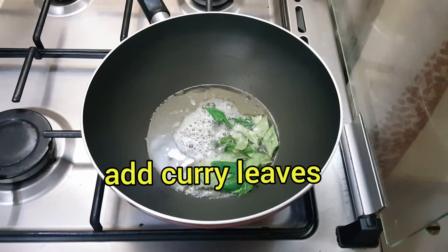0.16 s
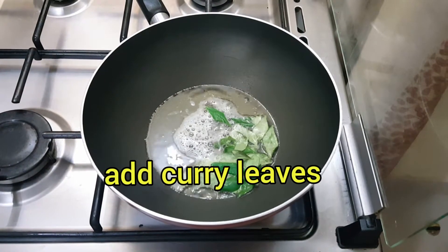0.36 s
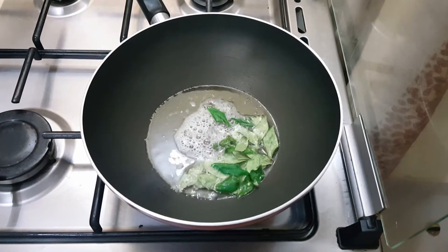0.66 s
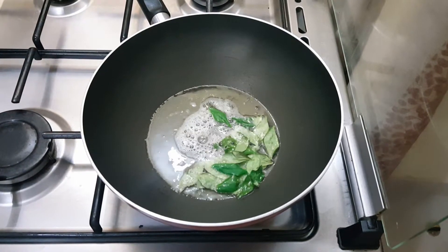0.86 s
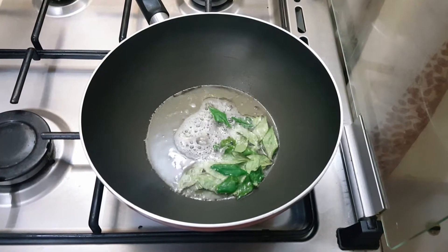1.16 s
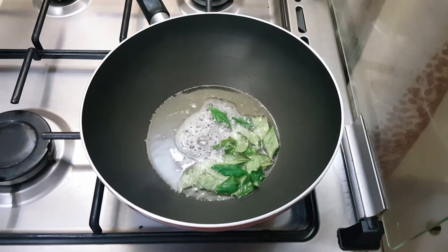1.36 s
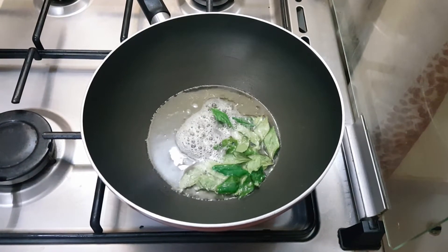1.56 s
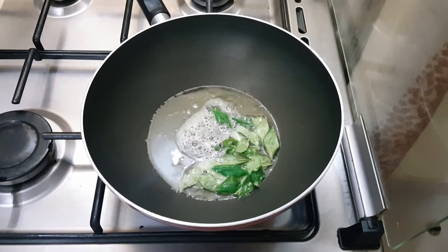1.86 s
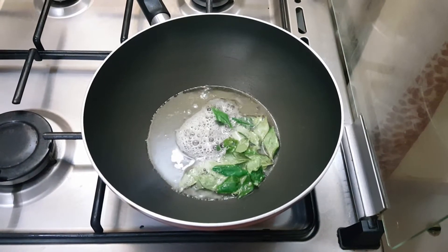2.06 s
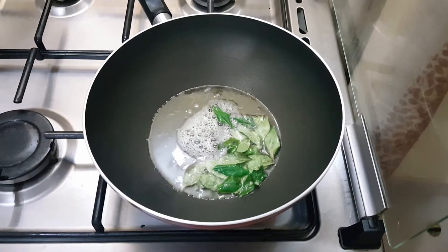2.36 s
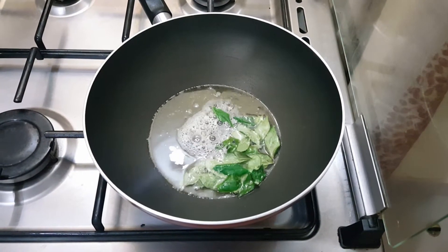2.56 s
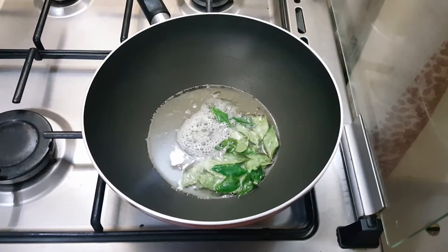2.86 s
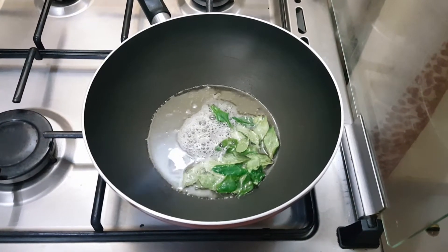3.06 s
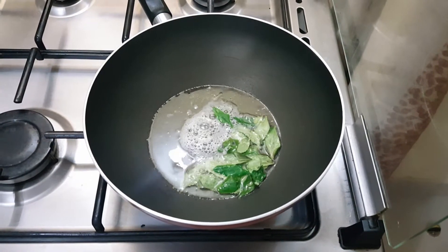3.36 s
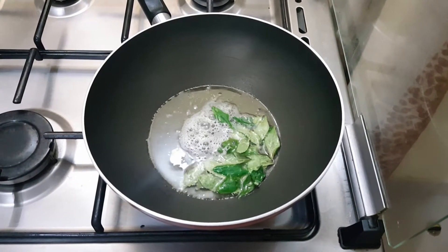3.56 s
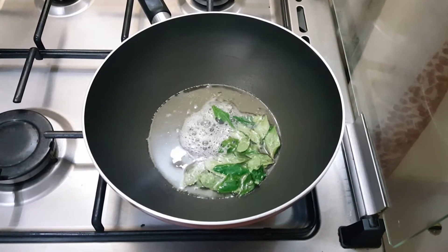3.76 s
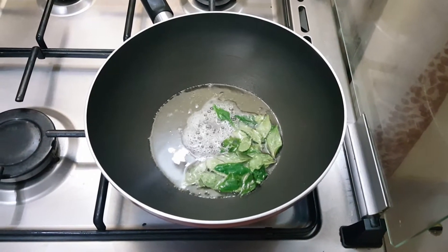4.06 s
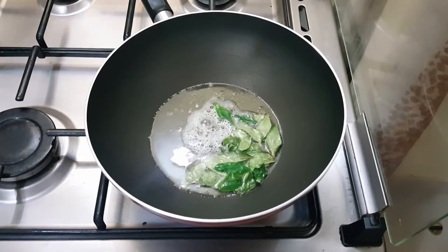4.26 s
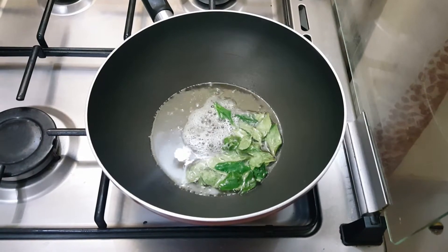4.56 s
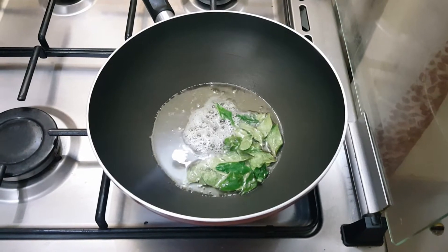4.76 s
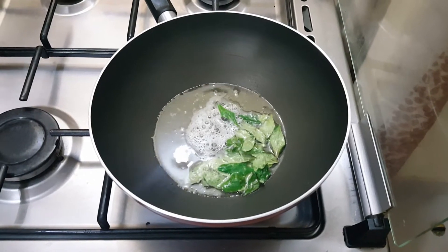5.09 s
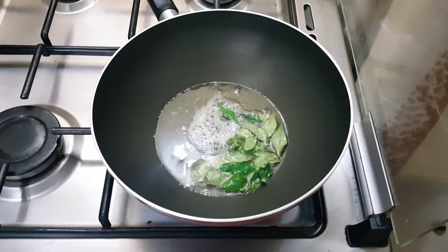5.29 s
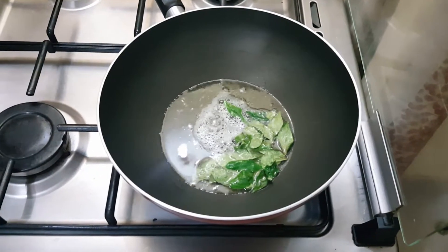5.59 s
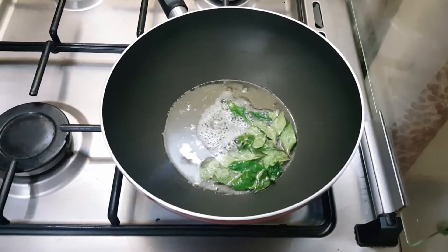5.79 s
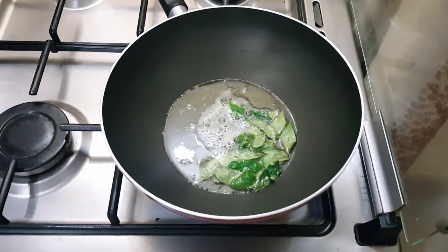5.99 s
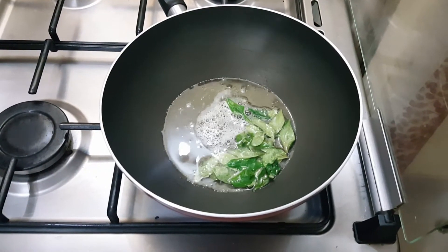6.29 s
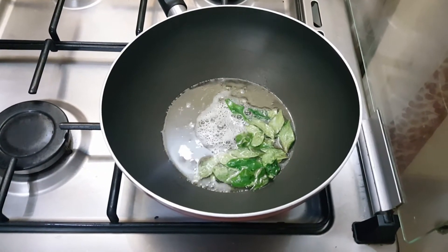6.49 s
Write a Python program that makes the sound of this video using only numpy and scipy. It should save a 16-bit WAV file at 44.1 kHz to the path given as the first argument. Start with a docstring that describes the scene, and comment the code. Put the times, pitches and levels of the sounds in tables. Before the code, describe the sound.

Heard from just above a wok on a home stove: a quiet, crisp sizzle with random hard pops, a few standing out loudly around one second, and fine spitting droplets between them. Bubbling eases steadily as the leaves dry, until only scattered clicks remain with wisps of fizz. Beneath lies a low, soft flame rumble with mains hum. The small room adds a brief, diffuse tail, and the pops lean slightly left.

```python
"""Curry leaves frying in a wok

Curry leaves and seeds fry in a pool of hot oil in a wok, heard from just above it in a small kitchen.
Steam bubbles pop as short damped sines with a noisy tear; oil spits are noise cracks with a push of air.
Swarms of tiny bubbles and filtered noise make a sizzle that thins out as the leaves dry.
Random echoes stand for the wok's wall and the room; noise and sines make stove rumble, mains hum and a drone.
"""
import sys
import numpy as np
from scipy import signal
from scipy.fft import rfft, irfft, next_fast_len
from scipy.io import wavfile
from scipy.ndimage import uniform_filter1d, map_coordinates

SR = 44100
rng = np.random.default_rng(int(sys.argv[2]) if len(sys.argv) > 2 else 0)


def generate_wav(sig):
    """Save sig (samples, or channels by samples) to the path in sys.argv[1] as 16-bit PCM at SR."""
    pcm = np.round(np.clip(np.atleast_2d(sig).T, -1, 1) * 32767).astype(np.int16)
    wavfile.write(sys.argv[1], SR, pcm)


N = 292383

# Large steam bubbles bursting. Each row: start in seconds, relative level in dB, pitch in Hz, ring in cycles.
POPS = [(.035, -33, 3420, 4.5), (0.112, -30.5, 3170, 0.75), (.129, -30, 4280, 1.6),
        (0.252, -28.5, 3580, 2.8), (0.3029, -33, 5030, 2.5), (0.4256, -28, 2400, 2.3),
        (0.5536, -30, 3710, .8), (.7046, -32, 3580, 4.3), (0.8135, -31.5, 4000, 2.5),
        (0.8818, -30, 3320, 2.2), (.8853, -23, 3740, 2.6), (1.0798, -36, 2970, 1.2),
        (1.0964, -31.5, 5070, 3.7), (1.1141, -16.5, 2320, 1.96), (1.242, -26.5, 3800, 0.99),
        (1.2536, -25.5, 2260, 1.6), (1.2635, -22.5, 2420, 2.3), (1.3962, -23, 2570, 1.8),
        (1.407, -27.5, 3640, 0.8), (1.4178, -15, 2130, 1.15), (1.434, -30, 1600, 1.2),
        (1.483, -31, 3930, 1.5), (1.5723, -23.5, 4400, 4.5), (1.6598, -26, 3400, 1.6),
        (1.7139, -28.5, 2750, 0.8), (1.7913, -32, 3160, 4), (1.8103, -26.5, 3200, 3.7),
        (1.9191, -32.5, 2630, 1.9), (1.9857, -33.5, 3200, 2.7), (2.0265, -33.5, 2400, 1.4),
        (2.0867, -28, 2740, 1.1), (2.1673, -22.5, 2970, 4.5), (2.2767, -35, 2120, 1.6),
        (2.361, -31.5, 3460, 2.3), (2.429, -36, 2290, 1.7), (2.4984, -31.5, 2100, 1.1),
        (2.508, -30.5, 2320, 2.6), (2.583, -23, 3400, 2.2), (2.616, -28, 2310, 1.7),
        (2.817, -26, 2270, 0.96), (2.8276, -21.5, 2680, 3.9), (2.9456, -32, 2190, 1.9),
        (3.0293, -29, 2280, 1.4), (3.0596, -31.5, 2540, 1.1), (3.0848, -27.5, 1840, 1.6),
        (3.1757, -36, 2620, 3.4), (3.1936, -33, 3300, 0.92), (3.2653, -29.5, 2600, 2.2),
        (3.3312, -34.5, 3370, 1.2), (3.3447, -37.5, 3730, 1.9), (3.4117, -35.5, 2930, 1.2),
        (3.5058, -20.5, 2630, 1.17), (3.543, -25.5, 2670, 1.1), (3.6062, -32.5, 4000, 5.5),
        (3.668, -31.5, 2100, 1.14), (3.7787, -29.5, 3500, 1.24), (3.8602, -33.5, 3300, 0.86),
        (3.866, -34, 4240, 0.94), (3.9568, -35.5, 3500, 1.5), (3.9693, -29, 3480, 3.6),
        (4.0696, -33, 2310, 0.95), (4.0778, -20.5, 3000, 2), (4.2632, -37.5, 3900, 0.6),
        (4.4237, -37, 3550, .8), (4.6336, -34, 2330, 1.9), (4.777, -35, 4060, 1.4), (4.84, -37, 3720, 2.4),
        (4.857, -38, 4330, 1.6), (4.9643, -30, 3670, 0.81), (5.2053, -28.5, 3040, 6.3),
        (5.3629, -35, 2900, 1.3), (5.561, -31, 2950, 1.23), (5.6195, -36, 4000, 1),
        (5.6702, -19.5, 3100, 0.77), (5.8142, -39.5, 2200, 1.1), (5.842, -30.5, 3550, 3),
        (6.0999, -30, 2670, 2), (6.2918, -29.5, 2750, 1.3), (6.3471, -36.5, 3420, 1.3),
        (6.377, -30.5, 4200, 2.4), (6.4125, -36, 3340, 0.89), (6.5635, -32.5, 2930, 3.4),
        (6.5786, -26.5, 1990, 1.5)]
# Sharpest spits of oil. Each row: start in seconds, relative crack level in dB, relative puff level in dB.
SPITS = [(0.147, -41, -49), (.5, -32, -35), (0.5731, -36, -43), (.7191, -36, -63), (0.8939, -21.5, -37.5),
         (1.181, -38.5, -54), (1.4982, -37, -64), (1.5648, -34, -55), (2.168, -35.5, -60),
         (2.2276, -37.5, -66), (2.499, -31.5, -66), (2.6874, -36.5, -49), (3.0374, -38, -71),
         (4.2467, -43, -59), (4.2984, -39, -54), (4.9465, -29, -39.5), (5.1299, -45, -66),
         (5.1945, -37, -54.5), (5.2509, -42, -70), (5.8785, -42.5, -51.5), (5.9871, -46, -51.5),
         (6.0414, -38.5, -45.5), (6.1406, -30.5, -35.5), (6.3619, -43.5, -54)]
# Boil, easing as the leaves dry. Each row: time in seconds, small-bubble gain in dB, foam-fizz gain in dB.
BOIL = [(0, -49, -56), (.14, -51, -47.5), (.33, -50.5, -55), (.54, -48.5, -52), (1.05, -50.5, -52.5),
        (1.6, -49, -52), (1.9, -52.5, -54.5), (2.4, -54, -59), (2.53, -51.5, -57), (2.9, -56, -62.5),
        (3.5, -54, -61.5), (3.78, -60, -62), (4.4, -59.5, -63), (4.88, -65.5, -60.5), (5.08, -62, -62.5),
        (5.45, -68, -67.5), (5.85, -58.5, -65.5), (6.55, -70, -65.5)]
# Filter shape of the sizzle's noise wash. Each row: frequency in Hz, gain in dB.
SIZZLE_SHAPE = [(300, -6), (750, -16), (1050, -7), (1500, 2), (2200, -3), (3400, -0.5), (4500, -7),
                (6000, -4), (8500, -19), (11000, -39), (16000, -41)]
# Filter shape of the foam fizz. Each row: frequency in Hz, gain in dB.
FIZZ_SHAPE = [(1500, -21), (4000, -11), (6500, 0.5), (8600, 5.5), (10200, -8), (12000, -1), (13500, -0.5),
              (15700, 0.5)]
# Filter shape of the spits' cracks. Each row: frequency in Hz, gain in dB.
CRACK_SHAPE = [(200, -18), (1000, 0.5), (2000, -3), (3500, 5.5), (4300, -0.5), (5500, -1), (8500, 2.5),
               (10200, -4), (15700, -5)]
# Filter shape of the stove rumble. Each row: frequency in Hz, gain in dB.
STOVE_SHAPE = [(20, 4), (50, -7.5), (100, 3.5), (160, 6.5), (260, 1.5), (420, -5.5), (600, -4.5),
               (780, -5.5), (1050, -10), (2000, -3.5), (5000, -19.5), (16000, -24)]
# How the bowl radiates. Each row: frequency in Hz, gain in dB.
WOK_SHAPE = [(100, -19.5), (500, -13), (780, -2.5), (1050, -11), (1450, 0.5), (3000, -1), (4300, 1),
             (6000, 1.5), (10000, -4.5), (16000, -17)]
# Mains hum partials. Each row: frequency in Hz, mid level in dB.
HUM = [(49, -74.5), (98, -73.5), (195.6, -73), (293.3, -72), (442.3, -77.5)]
# Port balance, shared out between the sides in scene(). Each row: frequency in Hz, left minus right in dB.
BALANCE = [(60, -1), (250, 2), (800, 1.5), (1400, 1), (2000, 4.5), (2700, 8), (3400, 9.5), (4200, -3),
           (5500, 5), (8000, 1.5), (14000, 4.5)]
# Likeness of the stove at the two ports. Each row: frequency in Hz, left-right correlation.
STOVE_ALIKE = [(60, 0.96), (290, 0.88), (640, 0.78), (1400, 0.27), (5000, 0.11)]
# Room decay. Each row: frequency in Hz, T60 in seconds.
KITCHEN_T60 = [(200, 0.41), (2000, 0.21), (5000, 0.18), (14000, 0.24)]
# Low drone that swells twice. Each row: time in seconds, relative level in dB.
DRONE = [(0, -72), (1, -72), (1.24, -59), (1.44, -71.5), (2.36, -67), (2.56, -56), (2.86, -69), (6.63, -70)]
# Soft low bump. One row: centre in seconds, level in dB, pitch in Hz, Gaussian half-length in seconds.
BUMP = (3.155, -57, 380, .025)

TOP_HZ = 16000
GRAIN_SAMPLES, BURST_SAMPLES = 512, 66
FULL_BOIL_DB = -50
# lesser pops at full boil
POPS_PER_S, POP_DB, POP_SCATTER_DB = 26, -37, 2
POP_HZ, POP_SCATTER_OCTAVES, POP_CYCLES = 3050, 0.27, 1.4
# lesser spits at full boil
SPITS_PER_S, SPIT_DB, SPIT_SCATTER_DB, PUFF_RE_CRACK_DB = 13, -45, 2, -20.5
# rarer and weaker lesser bursts as the boil eases
RATE_DB_PER_BOIL_DB, SIZE_DB_PER_BOIL_DB = 0.5, 0.47
TEAR_HZ = 2520  # low-pass corner


def pops(level_db=-2.0, lag_s=0.000038, lag_spread_s=0.000022, tear_db=-11.5, pan_spread_db=1.4):
    """Steam bubbles burst at the leaves: cavity ring plus film tear, mostly a little earlier at the left port."""
    out = np.zeros((2, N))
    t = np.arange(GRAIN_SAMPLES) / SR
    dice = np.random.default_rng(rng.integers(1 << 30))
    film = t * np.exp(-t / 0.0006)  # the oil film tears open within a millisecond
    dulling = [1, -np.exp(-2 * np.pi * TEAR_HZ / SR)]
    for s, db, hz, cycles in POPS + lesser_pops():
        lag = lag_s + lag_spread_s * dice.normal()
        ring = bubble(np.array([t, t - lag]), hz, cycles)
        noise = signal.lfilter([1], dulling, dice.standard_normal((2, GRAIN_SAMPLES)))
        tear = amp(tear_db) * burst(noise * film)
        sides_db = pan_spread_db * dice.normal() * np.array([[0.5], [-0.5]])
        pop = in_wok(ring + tear, echo_db=-3, t60_s=0.013, dice=dice)
        add(out, s, amp(db + level_db + sides_db) * pop)
    return coloured(out, WOK_SHAPE)


def lesser_pops():
    """Middling bubbles between the large ones, in rows like POPS."""
    return [(s, POP_DB + db, POP_HZ * 2 ** (POP_SCATTER_OCTAVES * pitch), POP_CYCLES * np.exp(ring / 2))
            for s, db, pitch, ring in by_chance(POPS_PER_S, POP_SCATTER_DB)]


def bubble(t, hz, cycles, swell=0.27):
    """A bursting bubble's cavity rings at a fixed pitch; its level swells and dies within a few cycles."""
    t = np.maximum(t, 0)
    u = t * hz / (swell * np.maximum(cycles, 0.5))
    return burst(u * np.exp(-u) * np.sin(2 * np.pi * hz * t))


def spits(crack_db=4.0, puff_db=3, puff_s=0.00033):
    """Trapped water flashes to steam: a bright noise crack and one push of air."""
    cracks, puffs = np.zeros((2, N)), np.zeros((2, N))
    t = np.arange(GRAIN_SAMPLES) / SR
    dice = np.random.default_rng(rng.integers(1 << 30))
    push = burst((1 - t / puff_s) * np.exp(-t / puff_s) * (1 - np.exp(-t / 0.00006)))
    snap = amp(-60 * t / 0.0022) * (1 - np.exp(-t / 0.0001))
    for s, db, low_db in SPITS + lesser_spits():
        noise = burst(dice.standard_normal((2, GRAIN_SAMPLES)) * snap)
        crack = in_wok(noise, echo_db=-7, t60_s=0.014, dice=dice)
        puff = in_wok(np.array([push, push]), echo_db=-3, t60_s=0.0026, dice=dice)
        add(cracks, s, amp(db + crack_db) * crack)
        add(puffs, s, amp(low_db + puff_db) * puff)
    return coloured(cracks, CRACK_SHAPE) + puffs


def lesser_spits():
    """Fine droplets between the sharp spits, in rows like SPITS."""
    return [(s, SPIT_DB + db, SPIT_DB + db + PUFF_RE_CRACK_DB + SPIT_SCATTER_DB * puff)
            for s, db, puff, _ in by_chance(SPITS_PER_S, SPIT_SCATTER_DB)]


def by_chance(per_second, scatter_db):
    """Random bursts that thin out with the boil: rows (s, dB over their typical level, two normal draws)."""
    dice = np.random.default_rng(rng.integers(1 << 30))
    boil_db = curves(BOIL)[0] - FULL_BOIL_DB
    due = np.cumsum(abs(per_second) * amp(RATE_DB_PER_BOIL_DB * boil_db)) / SR  # bursts due so far
    draws = dice.standard_normal((int(due[-1]), 4))
    turns = (np.arange(len(draws)) + draws[:, 0]) % due[-1]
    at = np.searchsorted(due, turns)
    db = SIZE_DB_PER_BOIL_DB * boil_db[at] + scatter_db * np.clip(draws[:, 1], -2, 2)
    return np.column_stack([at / SR, db, draws[:, 2:]])


def sizzle(bubbles_db=0, wash_db=-7.5, foam_db=-7.5, hiss_db=-2.0, surge_db=0.32, surges_per_s=9):
    """Small bubbles crackle and the foam fizzes in little surges; the tiniest merge into noise."""
    boil_db, fizz_db = np.array(curves(BOIL)) + surge_db * wobble(surges_per_s)
    small = swarm(boil_db, per_second=600, hz=3320, spread=0.2, cycles=1.53, size_db=4.5)
    foam = swarm(fizz_db, per_second=800, hz=9500, spread=0.18, cycles=1.27, size_db=3.5)
    wash = coloured(patchy(rng.standard_normal((2, N)), depth_db=3.0), SIZZLE_SHAPE)
    body = amp(bubbles_db) * unit(coloured(small, WOK_SHAPE)) + amp(wash_db) * unit(wash)
    fizz = amp(foam_db) * unit(foam) + amp(hiss_db) * rng.standard_normal((2, N))
    top = coloured(patchy(fizz, depth_db=5.0), FIZZ_SHAPE)
    return amp(boil_db) * body + amp(fizz_db) * top


def swarm(level_db, per_second, hz, spread, cycles, size_db, crowding=0.4):
    """Countless small bubbles, more frequent in a harder boil; grain gain offsets the crowding."""
    density = amp(level_db - level_db.max()) ** abs(crowding)
    rows = np.random.default_rng(rng.integers(1 << 30)).random((int(per_second * N / SR), 5))
    kept = rows[:, 1] < density[(rows[:, 0] * N).astype(int)]
    when, _, pitch, size, side = rows[kept].T
    start = (when * N).astype(int)
    k = np.arange(GRAIN_SAMPLES // 4)
    pitch_hz = np.clip(hz * np.exp(spread * np.log(pitch / (1 - pitch))), 900, TOP_HZ)
    gain = amp(-size_db * np.log(np.maximum(size, 0.04))) / np.sqrt(density[start])
    ports = []
    for lag_s in (0 * side, (side - 0.3) * 0.00021):
        grains = gain[:, None] * bubble(k / SR - lag_s[:, None], pitch_hz[:, None], cycles)
        places = start[:, None] + k
        ports.append(np.bincount(places.ravel(), grains.ravel(), N + GRAIN_SAMPLES)[:N])
    return in_wok(np.array(ports), echo_db=-7, t60_s=0.012)[:, :N]


def patchy(x, depth_db):
    """The sizzle's wash and the foam fizz flicker in short patches: random gain over time and pitch."""
    z = signal.stft(x, nperseg=256)[2]
    over_pitch = uniform_filter1d(rng.standard_normal(z.shape[1:]), size=24, axis=0)
    field = uniform_filter1d(over_pitch, size=3, axis=1)
    return signal.istft(z * amp(depth_db * unit(field)), nperseg=256)[1][:, :N]


def in_wok(sound, echo_db, t60_s, gap_s=0.0007, dice=None):
    """The curved wall throws back a quick cluster of echoes, drawn anew for each call and port."""
    t = np.arange(GRAIN_SAMPLES) / SR
    echoes = (dice or rng).standard_normal((2, GRAIN_SAMPLES)) * amp(-60 * t / t60_s) * (t > gap_s)
    paths = amp(echo_db) * echoes / np.linalg.norm(echoes, axis=1, keepdims=True)
    paths[:, 0] = 1  # direct sound
    return signal.fftconvolve(sound, paths, axes=1)


def kitchen(x):
    """Diffuse room answer with decay by frequency; a new random tail for each quarter second of sound."""
    out, size = np.zeros((2, N)), SR // 4
    for start in range(0, N, size):
        hz, t, z = signal.stft(rng.standard_normal((2, SR // 2)), SR, nperseg=256)
        decay = amp(-60 * t / along(KITCHEN_T60, hz)[:, None])
        tail = signal.istft(z * decay, SR, nperseg=256)[1]
        tail *= 1 - np.exp(-np.arange(tail.shape[1]) / SR / 0.0037)  # soft onset
        tail /= np.linalg.norm(tail, axis=1, keepdims=True)
        add(out, start / SR, signal.fftconvolve(x[:, start:start + size], tail, axes=1))
    return out


def stove(rumble_db=-57, fade_db_per_s=0.5, flicker_db=1, waver_db=3.5):
    """The burner's soft noise rumble, nearly mono in the bass, over a wavering mains hum and a low drone."""
    turn = np.arccos(np.clip(along(STOVE_ALIKE, np.fft.rfftfreq(N, 1 / SR)), -1, 1)) / 2
    mid, side = irfft(rfft(rng.standard_normal((2, N))) * [np.cos(turn), np.sin(turn)], N)
    rumble = unit(coloured(np.array([mid + side, mid - side]), STOVE_SHAPE))
    t = np.arange(N) / SR
    flame_db = rumble_db - fade_db_per_s * t + flicker_db * wobble(12)
    hum = np.zeros(N)
    for hz, db in HUM:
        level = amp(db + waver_db * wobble(2.04)) * np.sqrt(2)
        hum += level * np.sin(2 * np.pi * hz * t + 0.29 * wobble(4.4))
    return amp(flame_db) * rumble + hum + amp(curves(DRONE)[0]) * drone()


def drone(hz=97, width_hz=22, db=-3):
    """A narrow band of noise, Gaussian in frequency."""
    band = np.exp(-((np.fft.rfftfreq(N, 1 / SR) - hz) / width_hz) ** 2)
    return amp(db) * unit(irfft(rfft(rng.standard_normal(N)) * band, N))


def bump():
    """One dull, soft bump: band noise under a Gaussian envelope."""
    s, db, hz, length_s = BUMP
    envelope = np.exp(-((np.arange(N) / SR - s) / length_s) ** 2)
    return envelope * drone(hz, width_hz=100, db=db)


def amp(db):
    """Decibels to gain."""
    return 10 ** (np.asarray(db) / 20)


def unit(x):
    """Scale to rms 1."""
    return x / np.sqrt(np.mean(x ** 2) + 1e-20)


def burst(x):
    """Scale a short sound so that its energy equals rms 1 over BURST_SAMPLES."""
    return x * np.sqrt(BURST_SAMPLES / (np.sum(x ** 2, axis=-1, keepdims=True) + 1e-20))


def along(points, hz):
    """(Hz, value) points read on a log axis."""
    f, v = np.transpose(points)
    return np.interp(np.log(hz + 1), np.log(f + 1), v)


def curves(rows):
    """One value per sample for each column after the time."""
    s, *cols = np.transpose(rows)
    return [np.interp(np.arange(N) / SR, s, c) for c in cols]


def wobble(knots_per_s):
    """A smooth random curve through normal draws."""
    knots = rng.standard_normal(int(N * knots_per_s / SR) + 4)
    return map_coordinates(knots, [np.arange(N) * knots_per_s / SR])


def coloured(x, points, share=1):
    """Causal minimum-phase filter with the gain of (Hz, dB) points, times share in dB."""
    size = 4096
    gain = amp(share * along(points, np.fft.rfftfreq(size, 1 / SR)))
    cepstrum = irfft(np.log(gain))
    cepstrum[1:size // 2] *= 2
    cepstrum[size // 2 + 1:] = 0
    kernel = irfft(np.exp(rfft(cepstrum)))
    return signal.fftconvolve(np.atleast_2d(x), kernel[None], axes=1)[:, :N]


def add(track, s, sound):
    """Mix a stereo sound into the track at time s."""
    start = int(np.clip(round(s * SR), 0, N - 1))
    track[:, start:start + sound.shape[1]] += sound[:, :N - start]


def scene(room_db=-7.0, spit_room_db=-3):
    """The frying and its room over the stove, with a port balance that varies with frequency."""
    bubbling = pops() + sizzle()
    spitting = spits()
    # spits shoot upward, so they sound drier
    room = amp(room_db) * kitchen(bubbling + amp(spit_room_db) * spitting)
    left, right = bubbling + spitting + room + stove() + bump()
    return np.vstack([coloured(left, BALANCE, share=0.32), coloured(right, BALANCE, share=-0.72)])


def record(dry):
    """Steep zero-phase low-pass at TOP_HZ."""
    size = next_fast_len(N + SR // 4)
    loss = 1 + (np.fft.rfftfreq(size, 1 / SR) / TOP_HZ) ** 160
    return irfft(rfft(dry, size) / loss, size)[:, :N]


dry = scene()
out = record(dry)
generate_wav(out)
```